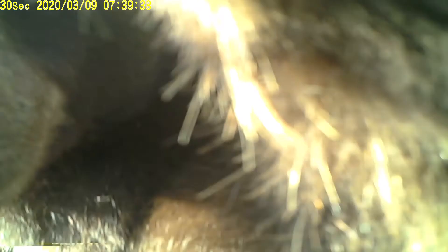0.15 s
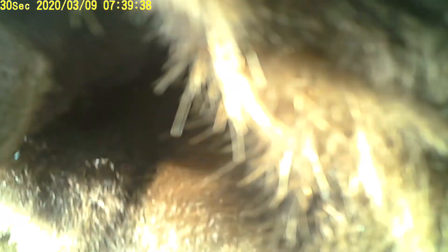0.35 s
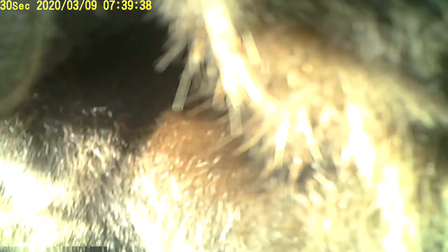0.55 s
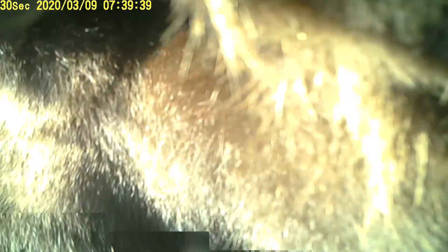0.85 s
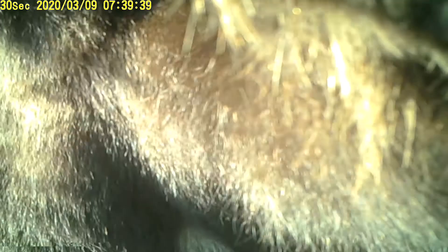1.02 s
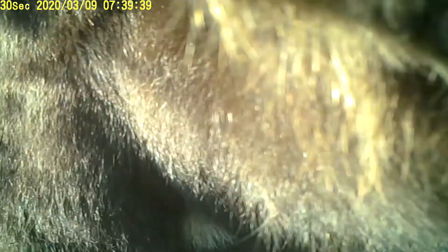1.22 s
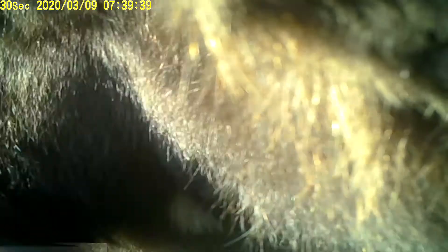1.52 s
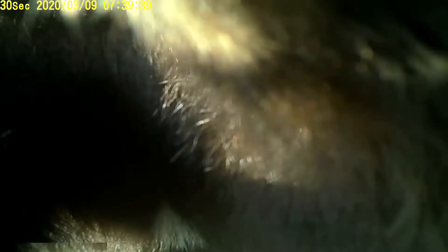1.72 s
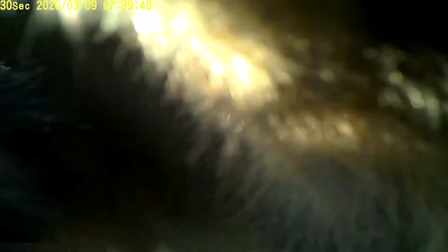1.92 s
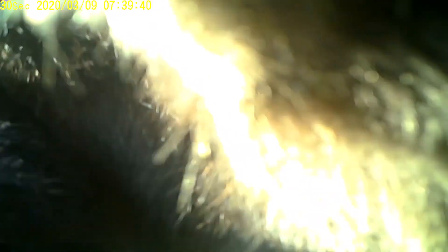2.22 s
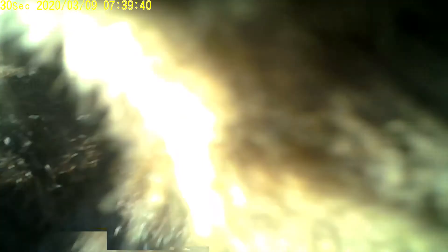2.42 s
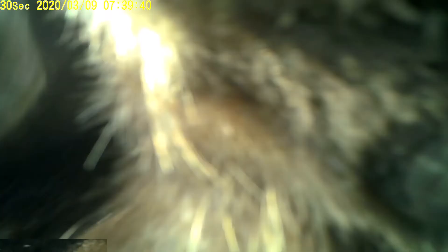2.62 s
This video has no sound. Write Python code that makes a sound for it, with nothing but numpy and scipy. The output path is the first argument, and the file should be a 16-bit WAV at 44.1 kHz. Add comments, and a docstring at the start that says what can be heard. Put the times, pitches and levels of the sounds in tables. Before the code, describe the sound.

Animal fur brushes right against an outdoor camera's microphone. Stiff hairs crackle in scattered ticks with soft bumps, then the muzzle knocks the plastic case loudly and the fur drags across in a gritty, rumbling rub over faint hiss.

```python
"""A bear rubs its fur and muzzle over an outdoor camera, right against the microphone. Stiff hairs catch
on the port and snap free, ringing the plastic case. The muzzle bumps and knocks it and squeaks once,
then the fur drags across in a gritty, rumbling rub, with tufts twanging as they let go. Twice the
treble flickers in glassy tones. The loudest contacts overload the microphone; faint hiss lies under it."""
import sys
import numpy as np
from scipy import signal
from scipy.fft import rfft, irfft, next_fast_len
from scipy.io import wavfile

SR = 44100
rng = np.random.default_rng(int(sys.argv[2]) if len(sys.argv) > 2 else 0)


def pcm_store(signal):
    """Save signal as 16-bit PCM."""
    levels = np.round(np.clip(np.atleast_2d(signal), -1, 1) * 32767)
    wavfile.write(sys.argv[1], SR, levels.astype(np.int16).T)


N = 121275
COVER_FROM_S, COVER_FULL_S = 1.93, 1.98  # the fur settles on the case
# Hairs leaving the port. Each row: start in seconds, level in dB, body and treble offsets in dB.
HAIR_SNAPS = [(.0038,-26,-2,5),(0.0486,-24,-2.5,4),(0.0792,-26,-2.5,4.5),(0.092,-16,-3.5,0),(0.1121,-13.5,-15,3),(0.1413,-37.5,-15,4),(0.1847,-35,-3.5,-2),(0.2036,-37.5,3.5,0),(0.252,-41.5,1,-9),
              (.3853,-19,-5,0.5),(.478,-43.5,7,-6),(0.5565,-12.5,-10,3.5),(0.6319,-30.5,-4,-7.5),(0.6685,-42.5,-12,2),(.6967,-43.5,-14,-2),(.734,-26,-16,2.5),(.737,-29.5,-5,5.5),(.829,-37.5,7,5),
              (0.8351,-26.5,0,8.5),(.896,-42,-9,-1),(0.9276,-31.5,-6,1),(0.9361,-22,-5.5,3.5),(.948,-28.5,3.5,4.5),(.967,-39,1,3),(0.9999,-29.5,-8,1.5),(1.0243,-27.5,-1.5,5),(1.0339,-41.5,3,4),(1.117,-25,-8,2),
              (1.1318,-42.5,8.5,-11),(1.266,-30,-3.5,4.5),(1.2958,-26.5,-0.5,1.5),(1.426,-36,-2.5,-10),(1.4382,-35,-7.5,-13),(1.5272,-23.5,-13.5,-1.5),(1.5978,-18.5,-10.5,-2.5),(1.6293,-16.5,-7,-4),
              (1.6825,-12.5,1,0.5),(1.6865,-21,6,0),(1.9199,-25.5,-4,-1.5),(1.9247,-19,-6.5,-13),(1.9553,-32,-8,-14),(1.9682,-26,0,-8),(1.9775,-26.5,-4,-3),(1.9888,-26.5,-4,-3),(1.9992,-30,7,0.5),
              (2.0133,-22.5,3,-2),(2.0389,-30.5,2,10.5),(2.054,-31,-3,6),(2.0871,-19.5,-8,0),(2.0939,-23,-11,4),(2.1124,-18.5,-12,4),(2.1512,-12.5,-2.5,0),(2.176,-24,1,-15),
              (2.2092,-23,-7,-1),(2.271,-20,-1,-8),(2.3,-29.5,-21,2),(2.3199,-17.5,1,-7),(2.3428,-21.5,-5.5,-5.5),(2.3668,-20.5,-11,-7),(2.3793,-18.5,0,0),(2.3995,-18.5,-5,1),
              (2.4145,-18,-7,3),(2.426,-23,0,-4),(2.4435,-16.5,-0.5,4),(2.447,-21,2,8),(2.4527,-18.5,2,4),(2.5074,-28.5,-13,-12),(2.552,-28.5,-3.5,-17),(2.616,-16.5,-1.5,-1),
              (2.625,-28,-2,-17),(2.6351,-16,-7,-2),(2.6461,-20,-6,0),(2.662,-17.5,-10.5,-0.5),(2.708,-20.5,-3.5,-14),(2.7167,-18.5,-7,1)]


def hair_snaps():
    """Each hair lets go of the port in a burst of grit; the treble dies first, the body lingers."""
    # Body, middle, treble. Each row: low and high edge in Hz, gain in dB, t60 in seconds,
    # tail level in dB, tail t60 in seconds.
    bands = [(316, 1513, 0.5, 0.037, -14, 0.13), (1610, 5590, 1.5, 0.017, -17.5, 0.066),
             (5570, 16700, 2.5, 0.0076, -30, 0.049)]
    out, t = np.zeros(N), np.arange(SR // 8) / SR
    hold_s = 0.0015
    for band, (low, high, gain_db, t60, tail_db, tail_t60) in enumerate(bands):
        shape = np.hypot(burst(t, hold_s, t60), amp(tail_db) * burst(t, hold_s, tail_t60))
        power = np.zeros(N)
        for s, db, body_db, treble_db in HAIR_SNAPS:
            offset_db = (body_db, 0, treble_db)[band]
            add(power, s, (amp(db + gain_db + offset_db) * shape) ** 2)
        bandpass = signal.butter(3, [low, high], "band", fs=SR, output="sos")
        out += np.sqrt(power) * unit(signal.sosfilt(bandpass, rng.standard_normal(N)))
    return out


def fur_rub():
    """Dense little slips make the bristly top of the rub and ring the hollow under the fur."""
    # The drag over the case. Each row: time in seconds, bristle level in dB, body level in dB.
    drag = [(1.94, -60, -29.5), (1.99, -34, -35), (2.06, -31.5, -30.5), (2.1, -53, -30.5), (2.16, -59, -35),
            (2.2, -43, -43), (2.26, -48, -48), (2.31, -42, -44), (2.38, -27, -21), (2.44, -29, -22),
            (2.5, -36, -30), (2.57, -36, -34), (2.62, -28, -29.5), (2.67, -34, -32.5), (2.7, -35.5, -38),
            (2.72, -29, -29), (2.75, -47, -36)]
    # Spectrum of the bristles. Each row: frequency in Hz, level in dB.
    bristle_colour = [(300, -5), (1150, -1), (1700, -7), (2200, 2), (2850, -0.5), (3400, -3), (5100, -1.5),
                      (6200, -12), (8500, -12), (12000, -11.5), (16000, -18)]
    # Resonances between fur and case. Each row: centre in Hz, width in Hz, gain in dB.
    hollow = [(100, 48, -6.5), (232, 36, 0), (285, 50, 0), (388, 40, -1), (535, 48, 2.5), (625, 70, -5),
              (900, 77, -15), (1130, 60, -8)]
    bristle_db, body_db = curves(drag)
    contact = np.clip((np.arange(N) / SR - drag[0][0]) / 0.02 + 1, 0, 1)  # fades in over 20 ms
    smooth_share = 0.18
    slips = np.sqrt(smooth_share + (1 - smooth_share) * grains(per_s=200) ** 2)
    bristle = amp(bristle_db - 0.5) * slips * noise(bristle_colour)
    friction = slips * rng.standard_normal(N)
    body = amp(body_db + 1.5) * unit(filtered(friction, lambda f: resonances(hollow, f)))
    stray_hairs = amp(-60) * grains(per_s=90) * noise(bristle_colour)  # brush the case throughout
    return hair_colour(contact * bristle + stray_hairs) + contact * body


def tuft_scrape():
    """A tuft is dragged right across the port, so fast that its snaps merge."""
    # Spectrum of the scrape. Each row: frequency in Hz, level in dB.
    colour = [(60, 12), (250, 5), (400, 1), (540, 3), (1200, -3), (1600, -9), (2050, 4), (2600, -5.5),
              (4500, -4), (6000, -5.5), (9000, -3), (11500, -5), (16000, -13)]
    start_s = 2.459
    return amp(-9) * burst(np.arange(N) / SR - start_s, hold_s=0.015, t60=0.039) * noise(colour)


def tuft_twangs():
    """A thick tuft lets go with a short, pitched ring."""
    # Each row: start in seconds, level in dB, pitch in Hz.
    tufts = [(2.271, -15, 2830), (2.32, -12, 2830), (2.343, -17, 2830), (2.366, -21, 2780),
             (2.4, -13, 2080), (2.415, -16, 2140), (2.426, -16, 2040), (2.616, -14, 2180),
             (2.707, -18, 2800)]
    out, t = np.zeros(N), np.arange(SR // 10) / SR
    for s, db, hz in tufts:
        add(out, s, amp(db) * ring(t, hz, t60=0.028))
    return out


def muzzle_bumps():
    """The muzzle pushes the air in the port through one slow swing; the housing shakes and hums on."""
    # Soft bumps. Each row: time in seconds, level in dB, pitch in Hz.
    bumps = [(.007, -15.5, 86.4), (.052, -13.5, 90), (.094, -9.5, 109.5), (.635, -22.5, 127),
             (.666, -26.5, 111), (1.297, -16.5, 132), (1.339, -25.5, 105), (1.425, -31.5, 127),
             (1.632, -20.5, 132), (1.686, -7, 146), (1.791, -11.5, 120), (1.88, -20.5, 80.5),
             (1.894, -11, 39.7), (2.155, -16, 156), (2.274, -19, 92.4), (2.324, -18, 110), (2.382, -12, 96),
             (2.466, -10, 36), (2.474, -7, 124), (2.541, -17.5, 110)]
    # Spectrum of the shaken case. Each row: frequency in Hz, level in dB.
    shake_colour = [(40, -6.5), (150, -19), (280, -1.5), (600, -18), (1000, -31), (3000, -55)]
    rise_cycles, fall_cycles = 0.42, 0.47
    shake_t60, hum_hz = 0.063, 259.5
    out, t = np.zeros(N), np.arange(-SR // 10, SR // 3) / SR
    for s, db, hz in bumps:
        cycles = t * hz
        rise = np.exp(-(np.minimum(cycles, 0) / rise_cycles) ** 2)
        swing = np.sin(2 * np.pi * cycles) * np.exp(-(np.maximum(cycles, 0) / fall_cycles) ** 2)
        shake = amp(-12 - 60 * np.maximum(t, 0) / shake_t60) * noise(shake_colour, size=len(t))
        hum = amp(-26) * ring(t, hum_hz, t60=0.33)
        hardness = 2 * hz / hum_hz  # quick bumps excite the case more than slow ones
        add(out, s + t[0], amp(db) * rise * (swing + hardness * (shake + hum)))
    return out


def muzzle_knocks():
    """Hard contacts ring the low modes of the case, most of all those near the pitch of the contact."""
    # Each row: start in seconds, level in dB, pitch of the contact in Hz.
    knocks = [(.094, -15, 600), (.386, -11.5, 1000), (.836, -26, 520), (1.6835, -4, 640), (1.789, -24, 450),
              (2.152, -18, 420), (2.272, -21, 500), (2.321, -17.5, 450), (2.381, -18, 330)]
    # Modes of the case. Each row: frequency in Hz, level in dB, t60 in seconds.
    modes = [(295, -6, .045), (415, -7.5, .045), (570, -4, .036), (640, -3, .04), (715, -3, .048),
             (835, -6.5, .055), (1030, -9, .07), (1200, -7, .06), (1450, -6, .034), (1900, -1, .024)]
    below_db_per_octave, above_db_per_octave = 6, 13
    out, t = np.zeros(N), np.arange(SR // 5) / SR
    attack = 1 - np.exp(-t / 0.0015)
    for s, db, contact_hz in knocks:
        for hz, mode_db, t60 in modes:
            octaves = np.log2(hz / contact_hz)
            loss_db = max(above_db_per_octave * octaves, -below_db_per_octave * octaves)
            level_db = db + mode_db - loss_db + rng.normal(0, 1)
            tone = np.sin(2 * np.pi * (hz * t + rng.random()))
            add(out, s, amp(level_db - 60 * t / t60) * attack * tone)
    return out


def muzzle_squeak():
    """Skin sticks and slips on the plastic: a short gritty chirp."""
    # Tones of the squeak and spectrum of its grit. Each row: frequency in Hz, level in dB.
    partials = [(1020, -18.5), (1215, -14.5), (1750, -24)]
    grit_colour = [(300, -8), (1300, -7), (3000, -3), (5500, 5), (8000, -30), (16000, -31)]
    peak_s, rise_s, fall_s = 1.929, 0.0076, 0.0066
    t = np.arange(N) / SR - peak_s
    swell = np.exp(-(t / np.where(t < 0, rise_s, fall_s)) ** 2)
    tone = sum(amp(db) * np.sin(2 * np.pi * hz * t) for hz, db in partials)
    return swell * (tone + amp(-26.5) * noise(grit_colour))


def hair_colour(x):
    """Case and port colour the sound of the hairs, and thin rings sound near 3.7, 4.5 and 7 kHz; the resonances
    shift once fur lies on the case."""
    # Resonances, free and under fur: the case, and thin rings near 3.7, 4.5 and 7 kHz. Each row: centre in Hz,
    # width in Hz, gain in dB.
    free_modes = [(415, 50, -9), (600, 120, -4), (1100, 200, -13), (2260, 370, -6), (3770, 270, -3),
                  (4580, 390, -4), (7110, 520, -8.5), (11660, 1180, 3.5)]
    covered_modes = [(380, 70, -2), (565, 70, 1), (1130, 150, -1.5), (2130, 190, 7.5), (2780, 240, 0),
                     (3920, 260, -1.5), (4450, 280, -2.5), (5120, 260, -5), (7200, 800, -5),
                     (9300, 1000, -2), (11400, 1400, 3)]
    # Response of the microphone port. Each row: frequency in Hz, gain in dB.
    port_colour = [(100, 0), (700, 1), (1000, -1), (1700, -3.5), (2500, -1), (4800, -1.5), (6000, -2.5),
                   (8000, 1), (12000, -1.5), (14500, -2), (16000, -22)]
    cover = np.clip((np.arange(N) / SR - COVER_FROM_S) / (COVER_FULL_S - COVER_FROM_S), 0, 1)
    free = filtered(x * (1 - cover), lambda f: 1 + resonances(free_modes, f))
    covered = filtered(x * cover, lambda f: amp(-4) + resonances(covered_modes, f))
    return coloured(free + covered, port_colour)


def panel_ring():
    """Each snap leaves a faint pure ring in the front panel, until the fur damps it."""
    out, t = np.zeros(N), np.arange(SR // 4) / SR
    for s, db, body_db, _ in HAIR_SNAPS:
        if s < COVER_FROM_S:
            add(out, s, amp(db + body_db / 2 - 13.5) * ring(t, hz=424, t60=0.19))
    return out


def port_rumble():
    """Fur pressing on the port heaves the air inside it."""
    # The press of the fur. Each row: time in seconds, level in dB.
    press = [(0, -42), (.12, -40), (.2, -47), (.9, -45), (1.2, -51), (1.58, -50), (1.68, -20.5),
             (1.75, -43), (1.85, -36.5), (1.91, -18.5), (1.97, -28), (2.06, -24), (2.16, -28), (2.24, -53),
             (2.33, -30.5), (2.4, -21), (2.47, -17.5), (2.52, -28), (2.62, -34), (2.75, -31)]
    # Spectrum of the rumble. Each row: frequency in Hz, level in dB.
    colour = [(10, -13), (24, -2.5), (35, 0), (52, -8), (90, -10.5), (150, -14), (300, -22), (800, -61)]
    press_db, = curves(press)
    return amp(press_db - 1.5) * noise(colour)


def treble_flickers():
    """The treble flickers briefly in thin, glassy tones."""
    # Each row: midpoint in seconds, length in seconds, pitch in Hz, level in dB.
    flickers = [(0.595, 0.027, 3230, -33), (0.594, 0.025, 3660, -35.5), (0.595, 0.027, 7000, -37),
                (0.596, 0.026, 8700, -28), (.595, 0.027, 11240, -27), (1.667, 0.029, 3760, -30.5),
                (1.666, 0.03, 6770, -36.5), (1.66, 0.025, 11550, -36)]
    width_hz = 70
    out, t = np.zeros(N), np.arange(N) / SR
    for s, length, hz, db in flickers:
        band = filtered(rng.standard_normal(N), lambda f: np.exp(-((f - hz) / width_hz) ** 2 / 2))
        window = np.exp(-(2 * (t - s) / length) ** 4)
        out += amp(db) * window * unit(band)
    return out


def background_hiss():
    """A faint, steady hiss with a deep low end lies under the contacts."""
    # Spectrum of the hiss. Each row: frequency in Hz, level in dB.
    colour = [(15, 6), (28, 0), (55, -3), (110, -6), (220, -12), (410, -8), (500, -16), (640, -9),
              (1000, -14.5), (1650, -18), (2150, -14), (3100, -18.5), (4200, -16.5), (6500, -19),
              (14000, -20), (16000, -25)]
    return amp(-51.5) * noise(colour)


def amp(db):
    """Decibels to gain."""
    return 10 ** (np.asarray(db) / 20)


def unit(x):
    """x scaled to rms 1."""
    return x / np.sqrt(np.mean(x ** 2) + 1e-20)


def add(track, s, sound):
    """Mix a sound into the track at s seconds."""
    i = round(s * SR)
    part = sound[max(-i, 0):max(N - i, 0)]
    track[max(i, 0):][:len(part)] += part


def filtered(x, response):
    """x through a complex response, given as a function of Hz."""
    size = next_fast_len(len(x) + 8192)
    return irfft(rfft(x, size) * response(np.fft.rfftfreq(size, 1 / SR)), size)[:len(x)]


def coloured(x, points):
    """x through a spectrum of (Hz, dB) points on a log axis."""
    f, db = np.transpose(points)
    return filtered(x, lambda hz: amp(np.interp(np.log(hz + 1), np.log(f), db)))


def resonances(modes, f):
    """Causal response of (Hz, width Hz, dB) resonances at the frequencies f."""
    return sum(amp(db) * 1j * f * width / (hz * hz - f * f + 1j * f * width) for hz, width, db in modes)


def noise(points, size=N):
    """Coloured noise of rms 1."""
    return unit(coloured(rng.standard_normal(size), points))


def curves(rows):
    """One value per sample for each column after the time."""
    s, *columns = np.transpose(rows)
    return [np.interp(np.arange(N) / SR, s, column) for column in columns]


def burst(t, hold_s, t60):
    """Envelope with a sudden attack, a hold and a fall of 60 dB every t60 seconds."""
    return np.clip(t / 0.00042, 0, 1) * amp(-60 * np.maximum(t - hold_s, 0) / t60)


def ring(t, hz, t60):
    """A pure tone that starts suddenly and dies away."""
    return burst(t, 0, t60) * np.sin(2 * np.pi * hz * t)


def grains(per_s):
    """Envelope of rms 1 of many tiny slips of random size."""
    spread_db, decay_s = 6, 0.002
    onsets = rng.random(N) < per_s / SR
    sizes = amp(spread_db * np.clip(rng.standard_normal(N), -2, 2))
    power = signal.lfilter([1], [1, -np.exp(-2 / (decay_s * SR))], onsets * sizes ** 2)
    return unit(np.sqrt(power))


def scene():
    """Outdoors, in mono, with the bear touching the camera itself: no room is heard."""
    fur = hair_colour(hair_snaps() + tuft_scrape()) + panel_ring() + tuft_twangs() + fur_rub()
    muzzle = muzzle_bumps() + muzzle_knocks() + muzzle_squeak()
    return (fur + muzzle + treble_flickers() + port_rumble() + background_hiss())[None]


def record(dry):
    """The microphone overloads softly, and the camera keeps nothing above its band limit."""
    ceiling, top_hz = 0.93, 16500
    clipped = dry[0] / (1 + np.abs(dry[0] / ceiling) ** 6) ** (1 / 6)
    return filtered(clipped, lambda hz: hz < top_hz)[None]


dry = scene()
out = record(dry)
pcm_store(out)
```